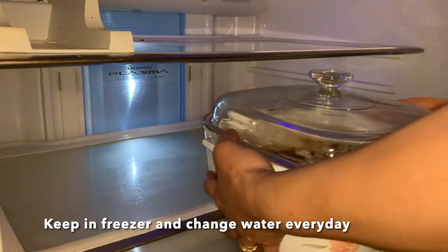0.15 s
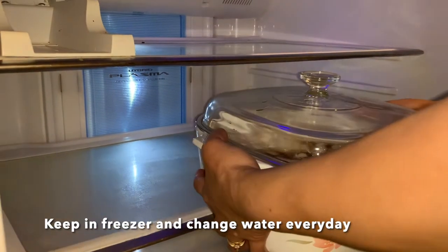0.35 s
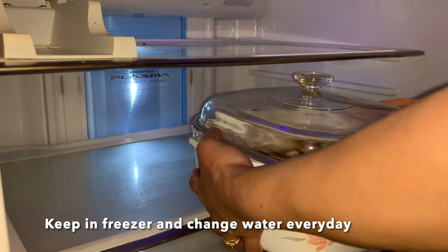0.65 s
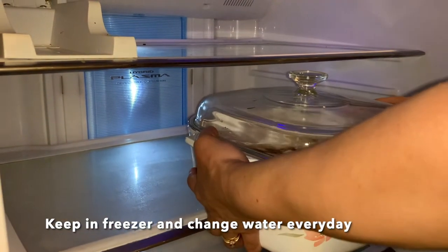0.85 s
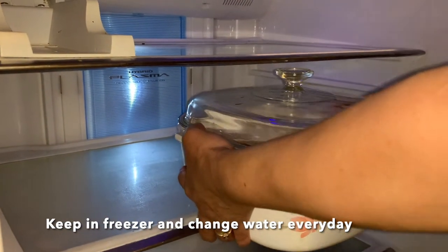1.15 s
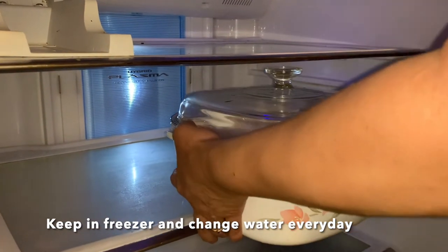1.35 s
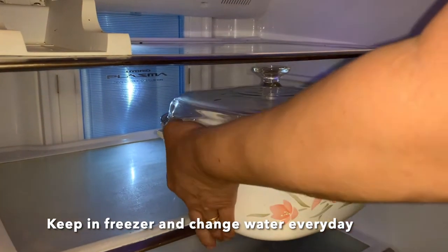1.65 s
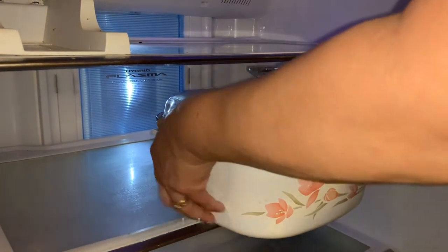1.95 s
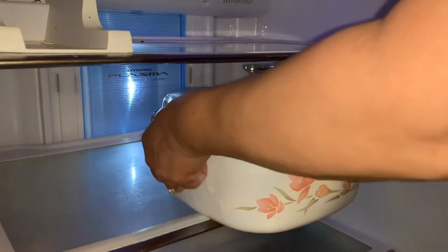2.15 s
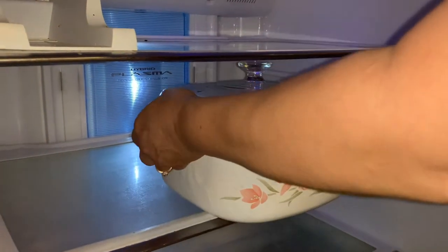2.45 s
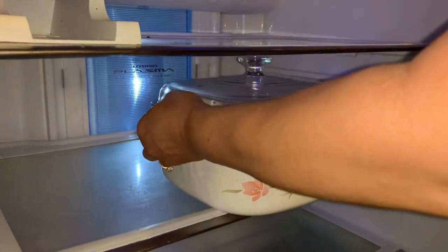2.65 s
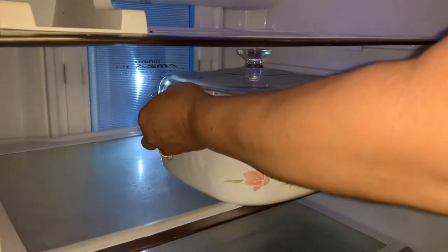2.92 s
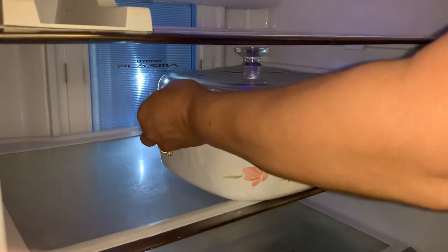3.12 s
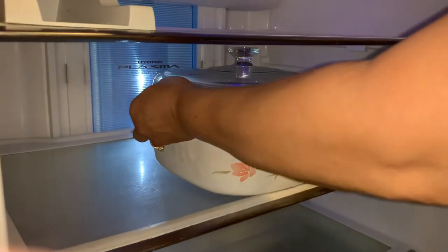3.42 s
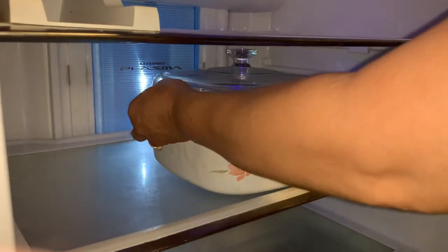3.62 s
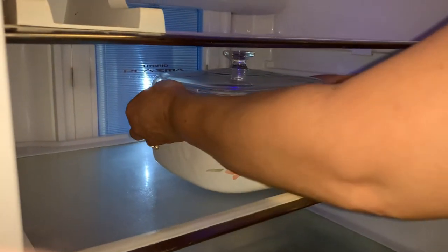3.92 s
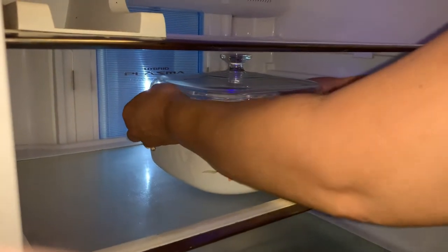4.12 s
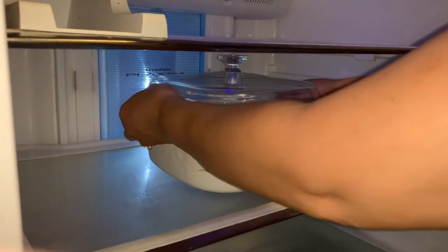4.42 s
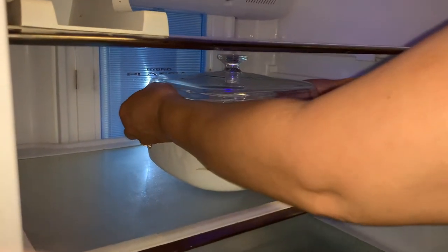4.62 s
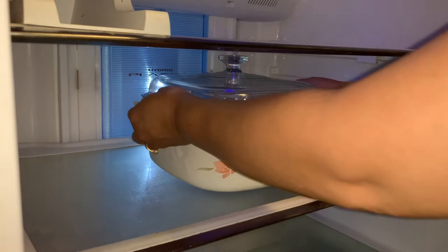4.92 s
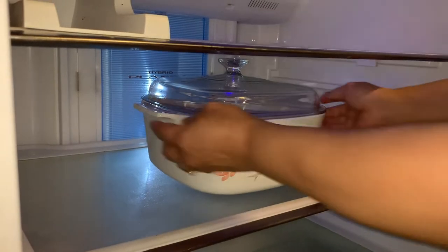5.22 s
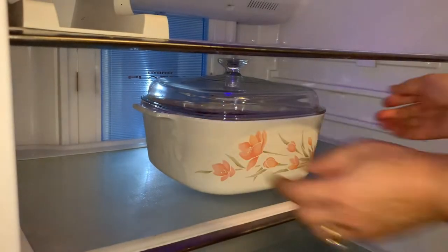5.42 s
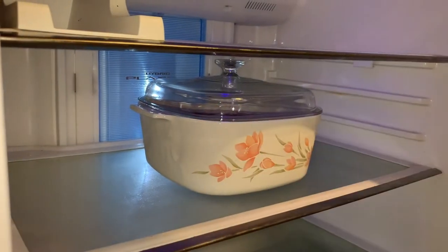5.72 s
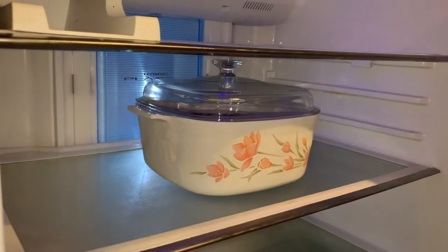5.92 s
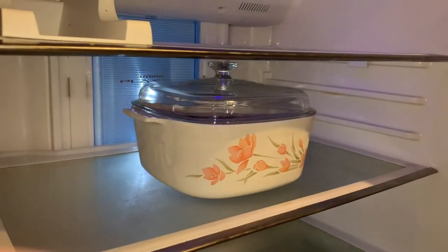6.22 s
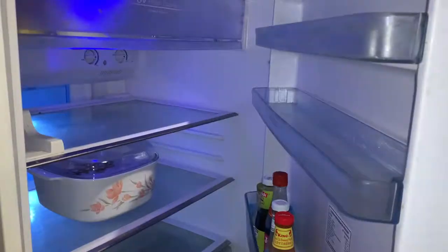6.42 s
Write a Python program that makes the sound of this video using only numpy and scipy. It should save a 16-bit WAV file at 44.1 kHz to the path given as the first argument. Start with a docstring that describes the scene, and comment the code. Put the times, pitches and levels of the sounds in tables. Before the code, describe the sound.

In a kitchen, a lidded ceramic pot is put on a glass fridge shelf, heard very close. Rough scraping and rapid knocks open it, booming softly through the cabinet. Sparse soft bumps, faint squeaks and isolated clacks follow, then a brief slowing clatter of dish and lid. Small handling ticks and airy skin brushes finish it, with short hollow echo, low hum, rumble and soft airy noise underneath.

```python
"""A lidded ceramic dish is slid onto a glass fridge shelf, close to the microphone.
It knocks, scrapes over the shelf's front edge, squeaks, and is set down with a ringing clatter of its lid.
Contacts ring the dish, shelf and cabinet as fading tones with bursts of noise; scrapes are shaped noise.
The fridge's hollow answers every contact with a short echo.
A low hum, a rumble and soft airy noise fill the quiet between, with a few thin hisses."""
import sys
import numpy as np
from scipy import signal
from scipy.fft import rfft, irfft, next_fast_len
from scipy.io import wavfile
from scipy.ndimage import map_coordinates

SR = 44100
rng = np.random.default_rng(int(sys.argv[2]) if len(sys.argv) > 2 else 0)


def to_wav(s):
    """Save 16-bit WAV."""
    ch = np.atleast_2d(s).T  # columns
    pcm = np.round(np.clip(ch, -1, 1) * 32767)  # PCM
    wavfile.write(sys.argv[1], SR, pcm.astype(np.int16))


N = 289296
RING = np.arange(int(SR * 0.7)) / SR  # time axis of one event, in seconds


# Dish knocks on the shelf: start_s, clack_db, cutoff_hz (treble limit of the contact),
# place (0 front edge, 1 middle), thud_db, thud_hz (centre)
KNOCKS = [(0.064, -44, 8950, 0.51, -35.5, 270), (0.145, -34, 7160, 0.35, -35.5, 280),
          (0.197, -42.5, 5000, 0.94, -37, 218), (0.264, -39, 12600, 0.23, -41.5, 267),
          (0.295, -42.5, 6000, 0.42, -41.5, 241), (1.499, -44, 1260, 0.3, -37, 205),
          (2.9691, -33.5, 3470, 0, -46, 310), (3.014, -50.5, 2530, 0.033, -50.5, 126),
          (3.5104, -25.5, 3280, 1, -34.5, 189.6), (6.304, -56, 4090, 0.19, -59.5, 201)]
# Soft bumps that only shake the cabinet: start_s, level_db, centre_hz
BUMPS = [(0.380, -43, 160), (0.427, -54.5, 179), (0.698, -60, 149), (1.525, -41, 144),
         (3.540, -35.5, 100.6), (6.390, -55, 202), (6.504, -52.5, 159.3)]
DISH_RING_DB = -15.5  # the dish rings this far under the clack while its lid stays seated
# After each knock the weight settles: a second contact, weaker, softer and deeper
SETTLE_S, SETTLE_CLACK_DB, SETTLE_THUD_DB = 0.014, -13.5, -0.5  # delay; changes in level
SETTLE_SOFTER, SETTLE_DEEPER = 0.4, 0.72  # factors on the cut-off and on the thud's centre


def knocks():
    """Each knock is a hard contact and a softer one as the weight settles; bumps are only thuds."""
    out = np.zeros((2, N))
    for s, clack_db, cut_hz, place, thud_db, thud_hz in KNOCKS:
        add(out, s, contact(clack_db, cut_hz, place, thud_db, thud_hz, clack_db + DISH_RING_DB))
        settle_db = clack_db + SETTLE_CLACK_DB
        settle = contact(settle_db, cut_hz * SETTLE_SOFTER, place, thud_db + SETTLE_THUD_DB,
                         thud_hz * SETTLE_DEEPER, settle_db + DISH_RING_DB)
        add(out, s + SETTLE_S, settle)
    for s, db, centre_hz in BUMPS:
        add(out, s, amp(db) * thud(centre_hz))
    return out


SET_DOWN_S, SET_CLACK_DB, SET_THUD_DB, SET_RING_DB = 4.8305, -33, -38, -28
SET_CUT_HZ, SET_THUD_HZ, SET_PLACE = 2460, 220, 0.84
ROCK_S, ROCK_SLOWING = 0.0112, 1.33  # first gap; power by which the contact times stretch
# Change in dB each time the count of contacts doubles
ROCK_CLACK_DB, ROCK_THUD_DB, ROCK_RING_DB = -3.5, -7, -6.5


def set_down(count):
    """The dish lands and its loose lid rocks to rest in ever slower, weaker contacts."""
    out = np.zeros((2, N))
    for k in range(count):
        spent = np.log2(1 + k)
        clack_db = SET_CLACK_DB + ROCK_CLACK_DB * spent
        thud_db = SET_THUD_DB + ROCK_THUD_DB * spent
        dish_db = SET_RING_DB + ROCK_RING_DB * spent
        hit = contact(clack_db, SET_CUT_HZ, SET_PLACE, thud_db, SET_THUD_HZ, dish_db)
        add(out, SET_DOWN_S + ROCK_S * k ** ROCK_SLOWING, hit)
    return out


# Ringing tones of dish and lid: pitch_hz, level_db (relative), t60_s (time to fade by 60 dB, lid free)
DISH_TONES = [(507.7, -6, 0.086), (677, -15, .18), (797, -6.5, 0.15), (841, -7, 0.26), (975, -16.5, .17),
              (1205, -6, 0.14), (1257, -10, 0.17), (1285, -10, 0.084), (1485, -22, 0.2), (1683, -7.5, 0.27),
              (1860, -23, 0.043), (1950, -17.5, 0.22), (2306, -11, 0.16), (2335, -19, 0.16),
              (2573, -29, 0.14), (2840, -11, 0.24), (2990, -22, 0.15), (3287, -16.5, 0.093),
              (3960, -22, 0.27), (4224, -10, 0.1), (4620, -24.5, 0.18), (4820, -35.5, 0.085),
              (5720, -29, 0.071), (6710, -23.5, 0.072), (8000, -29.5, .12)]
# Colour of the lid's buzz on the rim: pitch_hz, level_db (relative, per Hz)
RIM_COLOUR = [(500, -24.5), (1300, 10.5), (4500, 3.5), (5300, -18), (6200, -5), (7200, -24), (8400, -8),
              (10000, -30.5), (14000, -38.5)]


def contact(clack_db, cut_hz, place, thud_db, thud_hz, dish_db):
    """One contact clacks on the shelf, shakes the cabinet and rings dish and lid."""
    hz, db, t60 = np.transpose(DISH_TONES)
    freedom = np.interp(dish_db, [-54, -42], [0.5, 1])  # a lid that hardly lifts is damped by the rim
    dish = ring(hz, db, t60 * freedom, attack=0.0043, scatter_db=1.7)
    chatter = 1 + 0.18 * wobble(260, len(RING))  # lid and rim buzz against each other
    rim_burst = np.exp(-RING / 0.013) * (1 - np.exp(-RING / 0.002))
    rim = struck(noise(RIM_COLOUR, len(RING)) * rim_burst)
    dish_and_lid = chatter * dish + amp(-18) * rim
    return amp(clack_db) * clack(place, cut_hz) + amp(thud_db) * thud(thud_hz) + amp(dish_db) * dish_and_lid


# Ringing tones of the glass shelf: pitch_hz, edge_db (struck at the front edge),
# middle_db (struck in the middle), t60_s; levels are relative
SHELF_TONES = [(550.3, -4.5, -13, 0.11), (668, -11, -4, 0.074), (775, -11, 8.5, 0.079),
               (882, -5.5, 1.5, 0.15), (972, 2, -19.5, 0.057), (1231, -11, -1, 0.089),
               (1416, -19, -0.5, 0.079), (1641, 4.5, -26.5, 0.046), (1797, -26, -7, 0.071),
               (2000, -9.5, -10, .07), (2207, -12, -14, 0.079), (2470, -2, -13.5, 0.055),
               (2744, -6, -13.5, 0.066), (3237, -9, -17, 0.083), (3892, -8, -10, 0.059),
               (4130, -7.5, -16, 0.057), (5050, -15.5, -33.5, 0.075)]
# Colour of the crack: pitch_hz, level_db (relative, per Hz)
CRACK_COLOUR = [(150, -14.5), (380, -1), (520, -6), (850, -1), (1900, -2), (2900, -10), (4300, -3),
                (5500, -15), (9000, -16), (14000, -13.5)]
# How long the crack lasts: pitch_hz, t60_s
CRACK_FADE = [(200, 0.35), (1000, 0.08), (4000, 0.062), (12000, .08)]


def clack(place, cut_hz):
    """A short crack and the shelf's ringing tones, whose mix depends on where it is hit."""
    hz, edge_db, middle_db, t60 = np.transpose(SHELF_TONES)
    db = edge_db + np.clip(place, 0, 1) * (middle_db - edge_db)
    modes = ring(hz, db, t60, attack=0.0026, scatter_db=2.0)
    burst = (1 + 2.0 * np.exp(-RING / 0.024)) * (1 - np.exp(-RING / 0.0026))
    dense = ports(rng.standard_normal(len(RING)), lambda f: amp(along(CRACK_COLOUR, f)))
    crack = struck(fade(dense, CRACK_FADE) * burst)
    return soften(amp(-4.0) * crack + amp(5.5) * modes, cut_hz, order=4)


# Ringing tones of the fridge cabinet: pitch_hz, level_db (relative), t60_s
CABINET_TONES = [(75, -8.5, 0.15), (106.43, -8, 0.34), (142, -5, 0.22), (158.4, -0.5, 0.16),
                 (193.5, 0.5, 0.16), (243.5, -5.5, 0.26), (264.1, 0.5, 0.15), (300, -7.5, 0.11),
                 (348.6, -10, 0.17), (383.3, -7, 0.19)]
# Colour of the low shudder, in thuds and under scrapes: pitch_hz, level_db (relative, per Hz)
JUDDER_COLOUR = [(25, -34.5), (50, -22.5), (75, -4), (150, -9.5), (250, -2.5), (380, -9), (520, -12.5),
                 (1000, -48), (3000, -86.5)]


def thud(centre_hz):
    """The cabinet swells slowly; a heavier, longer push (lower centre) favours its lower tones."""
    hz, db, t60 = np.transpose(CABINET_TONES)
    favour = lambda f: -9 * np.log2((f + 1) / centre_hz) ** 2  # dB
    colour = lambda f: amp(along(JUDDER_COLOUR, f) + 1.3 * favour(f))
    shudder = spread(rng.standard_normal((2, len(RING))), colour)
    swell = np.exp(-RING / 0.025) * (1 - np.exp(-RING / 0.0037))
    modes = ring(hz, db + favour(hz), t60, attack=0.0061, scatter_db=-1.5)
    return amp(4) * modes + amp(-0.5) * swell * shudder


# Scrapes of the foot: start_s, length_s, grit_db, cutoff_hz (treble limit of the grit)
SCRAPES = [(0.04, 0.018, -51, 7870), (0.056, 0.041, -38, 13300), (0.097, 0.14, -45, 5030),
           (0.176, 0.049, -39.5, 14100), (0.222, .11, -49, 11830), (1.447, 0.076, -42.5, 1360),
           (1.445, 0.074, -52.5, 13200), (1.592, 0.21, -60, 1220), (3.474, 0.081, -60.5, 11920)]
# Colour of the grit: pitch_hz, level_db (relative, per Hz)
GRIT_COLOUR = [(150, -21.5), (450, 6.5), (900, 1.5), (1600, -6), (4300, -7.5), (5300, -18), (8500, -19.5),
               (11500, -26.5), (13500, -16.5), (15500, -30)]
SCRAPE_JUDDER_DB = -5  # the shelf's shudder, relative to a scrape's grit
EDGE_START_S, EDGE_END_S, EDGE_DB = 0.062, 0.311, -40  # the full weight drags over the front edge
EDGE_ATTACK_S, EDGE_RELEASE_S = 0.011, 0.059


def drags():
    """The rough foot catches and slips: dense sharp grains over a low judder, strongest on the edge."""
    out = np.zeros((2, N))
    for s, length, grit_db, cut_hz in SCRAPES:
        slips = rng.standard_normal(len(RING)) * amp(2.6 * wobble(500, len(RING)))
        grit = ports(slips, lambda hz: amp(along(GRIT_COLOUR, hz)) * ripple(hz, depth_db=7.5))
        grit = soften(grit, cut_hz, order=2)
        judder = amp(SCRAPE_JUDDER_DB) * noise(JUDDER_COLOUR, len(RING))
        add(out, s, amp(grit_db) * stroke(length, edge=0.58) * (grit + judder))
    after_edge = np.maximum(EDGE_START_S + RING - EDGE_END_S, 0)
    weight = (1 - np.exp(-RING / EDGE_ATTACK_S)) * np.exp(-after_edge / EDGE_RELEASE_S)
    add(out, EDGE_START_S, amp(EDGE_DB) * weight * noise(JUDDER_COLOUR, len(RING)))
    return out


SQUEAK_SAG, SQUEAK_OCTAVE_DB = 0.043, -29  # share by which the pitch sinks; level of the overtone
# Squeaks of the dish's foot: start_s, length_s, pitch_hz (midway), level_db
SQUEAKS = [(1.596, 0.024, 643, -58.5), (1.626, 0.1, 674, -60.5), (1.673, 0.03, 645, -52.5),
           (1.776, 0.034, 649, -53.5)]


def squeaks():
    """Where slipping turns regular, the foot sings a short, slightly unsteady note."""
    out = np.zeros((2, N))
    for s, length, pitch_hz, db in SQUEAKS:
        sag = SQUEAK_SAG * np.interp(RING, [0, length], [0.5, -0.5])
        pitch = pitch_hz * (1 + sag + 0.024 * wobble(140, len(RING)))
        phase = 2 * np.pi * np.cumsum(pitch) / SR
        note = unit(np.sin(phase) + amp(SQUEAK_OCTAVE_DB) * np.sin(2 * phase))
        add(out, s, amp(db) * stroke(length, edge=0.62) * note)
    return out


TICK_OCTAVES, TICK_T60 = 0.49, 0.066  # width; seconds to fade by 60 dB
HISS_RISE_S, HISS_FADE_DB_PER_S = 0.02, 24
# Light ticks of handling: start_s, level_db, centre_hz
TICKS = [(1.498, -55, 2850), (1.81, -77.5, 3800), (2.36, -77.5, 4100), (2.643, -76, 4000),
         (3.058, -74.5, 4650), (3.175, -74.5, 4700), (3.298, -66, 3660), (4.573, -73, 1900),
         (5.223, -71.5, 4430), (5.382, -54, 3840), (5.648, -68, 2200)]
# Brushes and thin hisses, likely of skin slipping on the glaze:
# start_s, length_s, level_db (before its fade), centre_hz, width_octaves
HISSES = [(2.036, 0.059, -75, 13200, .044), (2.147, .12, -67, 12900, 0.13),
          (2.15, 0.068, -69.5, 4220, 0.52), (3.391, .06, -55, 4300, 0.99), (3.393, 0.13, -73, 13000, .08),
          (5.31, 0.35, -65.5, 8490, .07), (5.321, 0.11, -69, 6460, 0.03), (5.325, 0.15, -71, 12700, 0.053),
          (5.521, 0.34, -59, 13470, .075), (5.529, .24, -73, 4840, 1), (6.252, 0.069, -63.5, 3940, 0.61)]


def handling():
    """Small ticks, and thin fluttering hisses that rise quickly and fade."""
    out = np.zeros((2, N))
    shape = np.exp(-np.log(1000) * RING / TICK_T60) * (1 - np.exp(-RING / 0.0018)) ** 2
    for s, db, centre_hz in TICKS:
        flicker = amp(1.7 * wobble(200, len(RING)))
        add(out, s, amp(db) * struck(band(centre_hz, TICK_OCTAVES) * shape * flicker))
    for s, length, db, centre_hz, octaves in HISSES:
        touch = np.clip(np.minimum(RING, length - RING) / HISS_RISE_S, 0, 1)
        level = amp(db - HISS_FADE_DB_PER_S * RING + 2.2 * wobble(47, len(RING)))
        add(out, s, level * touch * band(centre_hz, octaves))
    return out


# How long the echo lasts: pitch_hz, t60_s
ECHO_FADE = [(100, 0.59), (500, 0.22), (2000, 0.28), (12000, 0.21)]


def hollow(x):
    """The short echo of the fridge's inside and the kitchen: x smeared by fading noise."""
    tail = fade(spread(rng.standard_normal((2, len(RING))), np.ones_like), ECHO_FADE)
    tail = tail * (1 - np.exp(-RING / 0.0055))
    return signal.fftconvolve(x, tail / np.linalg.norm(tail[0]), axes=1)[:, :N]


AIR_DB = 2  # airy noise, relative to the level in AIR_LEVEL
RUMBLE_DB, RUMBLE_FOLLOWS = -64, 0.81  # mean level; share of the air's swings
DIP_START_S, DIP_END_S, DIP_EDGE_S, DIP_DB = 6.341, 6.362, 0.0027, -19  # the level dips briefly
AIR_DROP_DB = -11.5  # the air is quieter from the start of the dip on
# Course of the background air, in groups: time_s, level_db (before AIR_DB and AIR_DROP_DB)
AIR_LEVEL = [
    [(0.5, -75.5), (0.862, -81), (1.066, -82.5), (1.4, -82)],
    [(1.9, -79), (2.13, -77), (2.316, -72.5), (2.92, -78)],
    [(3.8, -73.5), (4.112, -80), (4.65, -82.5), (4.78, -80)],
    [(5.1, -78.5), (5.738, -71), (6.172, -74.5), (6.24, -75)],
]
# Colour of the rumble: pitch_hz, level_db (relative, per Hz)
RUMBLE_COLOUR = [(20, -43), (40, -17), (65, -5), (100, -11), (150, 2.5), (200, -3), (250, -1.5), (300, -10),
                 (450, -16.5), (650, -24.5), (1300, -66.5)]
# Colour of the airy noise: pitch_hz, level_db (relative, per Hz)
AIR_COLOUR = [(250, -21), (500, 1), (1200, -1), (1700, -7.5), (2800, -13.5), (4100, -11.5), (5000, -25),
              (6200, -17.5), (7400, -29), (8200, -18), (9500, -28), (15000, -38)]
# The fridge's hum tones: pitch_hz, level_db (rms, before the hum's shared trim)
HUM_TONES = [(145.3, -80), (242.2, -72.5), (484.5, -87), (1217, -90)]


def background():
    """The fridge's wavering hum in a low rumble and soft airy noise that swell together."""
    t = np.arange(N) / SR
    time_s, db_points = np.transpose(np.vstack(AIR_LEVEL))
    level_db = np.interp(t, time_s, db_points)
    rumble_db = RUMBLE_DB + RUMBLE_FOLLOWS * (level_db - level_db.mean())
    rumble = amp(rumble_db + 0.36 * wobble(9.6, N)) * noise(RUMBLE_COLOUR, N)
    air_db = level_db + AIR_DB + AIR_DROP_DB * (t > DIP_START_S)
    air = amp(air_db) * noise(AIR_COLOUR, N)
    hum = sum(amp(db) * unit(np.sin(2 * np.pi * hz * t + 0.7 * wobble(5, N))) for hz, db in HUM_TONES)
    return rumble + air + amp(-0.5) * hum


def dip():
    """Gain of the brief dip in level, with short slopes on both sides."""
    t = np.arange(N) / SR
    inside = np.minimum(t - DIP_START_S, DIP_END_S - t)
    return amp(DIP_DB * np.clip(1 + inside / DIP_EDGE_S, 0, 1))


def amp(db):
    """Decibels to gain."""
    return 10 ** (np.asarray(db) / 20)


def unit(x):
    """Scale to rms 1."""
    return x / np.sqrt(np.mean(x ** 2) + 1e-20)


def struck(x):
    """Scale to rms 1 over the first fiftieth of a second."""
    return x / np.sqrt(np.mean(x[..., :SR // 50] ** 2) + 1e-20)


def along(points, hz):
    """Read a table of (pitch, value) points on a log pitch axis."""
    f, v = np.transpose(points)
    return np.interp(np.log(hz + 1), np.log(f), v)


def wobble(rate, size):
    """A smooth random curve with rate knots a second."""
    return map_coordinates(rng.standard_normal(size // 20 + 4), [np.arange(size) * rate / SR + 1])


def add(track, s, x):
    """Mix x into the track from time s on."""
    start = max(round(s * SR), 0)
    track[:, start:start + x.shape[-1]] += x[..., :max(N - start, 0)]


def soften(x, cut_hz, order):
    """A softer contact lacks the treble, so filter it off above cut_hz."""
    b, a = signal.butter(order, np.clip(cut_hz, 50, SR * 0.45), fs=SR)
    return signal.lfilter(b, a, x)


def stroke(length, edge):
    """A rounded swell of the given length; a small edge makes it squarer."""
    return np.abs(np.sin(np.pi * np.clip(RING / length, 0, 1))) ** edge * (RING < length)


def fade(x, t60s):
    """Let each frequency of x die at its own speed."""
    hz, t, z = signal.stft(x, SR, nperseg=128)
    fading = z * amp(-60 * t / along(t60s, hz)[:, None])
    return signal.istft(fading, SR, nperseg=128)[1][:, :x.shape[-1]]


def ripple(hz, depth_db):
    """Gain of the many close, weak resonances that one contact happens to excite."""
    knots = np.arange(0, SR / 2, 110)
    bumps = np.interp(hz, knots, rng.standard_normal(len(knots)))
    return amp(depth_db * bumps * np.minimum(hz / 1500, 1))


def band(centre_hz, octaves):
    """Stereo noise in one bell-shaped cluster of resonances."""
    bell = lambda hz: 1 / (1 + (np.log2((hz + 1) / centre_hz) / octaves) ** 2 / 2) ** 2
    return ports(rng.standard_normal(len(RING)), lambda hz: bell(hz) * ripple(hz, depth_db=6.5))


def noise(spectrum, size):
    """Stereo noise of rms 1 with the given spectrum."""
    return spread(rng.standard_normal((2, size)), lambda hz: amp(along(spectrum, hz)))


# How alike left and right are: pitch_hz, likeness (0 unrelated, 1 the same)
LIKENESS = [(60, 0.94), (200, 0.95), (400, 0.64), (750, 0.37), (1300, 0.12), (2400, 0), (4300, 0.12),
            (9000, 0)]


def half_angle(hz):
    """Half the angle between left and right that gives their likeness at each frequency."""
    return np.arccos(np.clip(along(LIKENESS, hz), -1, 1)) / 2


def spread(pair, gain):
    """Colour two unrelated signals by gain(Hz) and blend them into left and right."""
    size = pair.shape[-1]
    m = next_fast_len(size + 4096)
    hz = np.fft.rfftfreq(m, 1 / SR)
    turn = half_angle(hz)
    mid, side = irfft(rfft(pair, m) * gain(hz) * [np.cos(turn), np.sin(turn)], m)[:, :size]
    return unit(np.array([mid + side, mid - side]))


def ports(x, gain):
    """Colour one close source by gain(Hz); its left-right phase wanders over frequency."""
    m = next_fast_len(len(x) + 4096)
    hz = np.fft.rfftfreq(m, 1 / SR)
    knots = np.arange(0, SR / 2, 700)
    lead = np.tanh(3 * np.interp(hz, knots, rng.standard_normal(len(knots))))
    apart = 1.17 * lead * half_angle(hz)
    turned = rfft(x, m) * gain(hz) * np.exp(1j * np.array([apart, -apart]))
    return unit(irfft(turned, m)[:, :len(x)])


def ring(hz, db, t60, attack, scatter_db):
    """Fading tones of random strength; each reaches left and right with its own phase."""
    strength, phase, lead = rng.standard_normal((3, len(hz)))
    apart = np.sign(lead) * half_angle(hz)
    turn = np.exp(1j * (np.pi * phase + np.array([apart, -apart])))
    start = amp(db + scatter_db * strength) * turn
    t = RING.astype(np.float32)
    angle = np.outer(np.float32(2 * np.pi * hz), t)
    decay = np.exp(np.maximum(np.outer(np.float32(-np.log(1000) / t60), t), -20))
    waves = start.real @ (decay * np.sin(angle)) + start.imag @ (decay * np.cos(angle))
    return waves * (1 - np.exp(-RING / attack)) / np.sqrt(np.sum(amp(db) ** 2) / 2)


def filtered(x, gain):
    """Multiply the spectrum of x by gain(Hz)."""
    m = next_fast_len(N + SR // 2)
    return irfft(rfft(x, m) * gain(np.fft.rfftfreq(m, 1 / SR)), m)[:, :N]


# Lean of the contacts to one side: pitch_hz, left_minus_right_db
LEAN = [(100, 0.5), (220, 0.5), (380, -4), (750, -2), (1300, 0.5), (2400, 0), (4400, -1.5), (8200, -10),
        (13000, 1)]


def scene():
    """The contacts, leaning left or right by frequency between the fridge's walls, echo and background."""
    contacts = knocks() + set_down(count=6) + drags() + squeaks() + handling()
    contacts = filtered(contacts, lambda hz: amp(np.outer([0.5, -0.5], along(LEAN, hz))))
    return (contacts + amp(-12.0) * hollow(contacts) + background()) * dip()


LOW_CUT_HZ, TOP_HZ = 46, 15720  # the microphone's bass roll-off; the band limit


def record(dry):
    """The microphone sheds the deepest bass, and nothing is kept above the band limit."""
    bass_cut = signal.butter(3, LOW_CUT_HZ, "high", fs=SR, output="sos")
    return filtered(signal.sosfilt(bass_cut, dry), lambda hz: hz < TOP_HZ)


dry = scene()
out = record(dry)
to_wav(out)
```